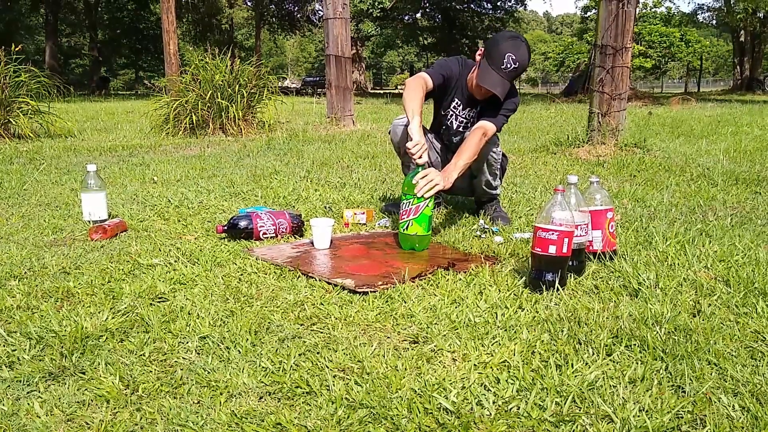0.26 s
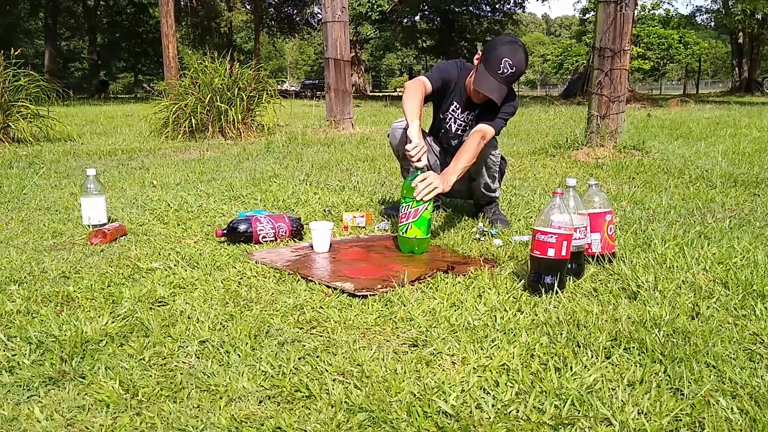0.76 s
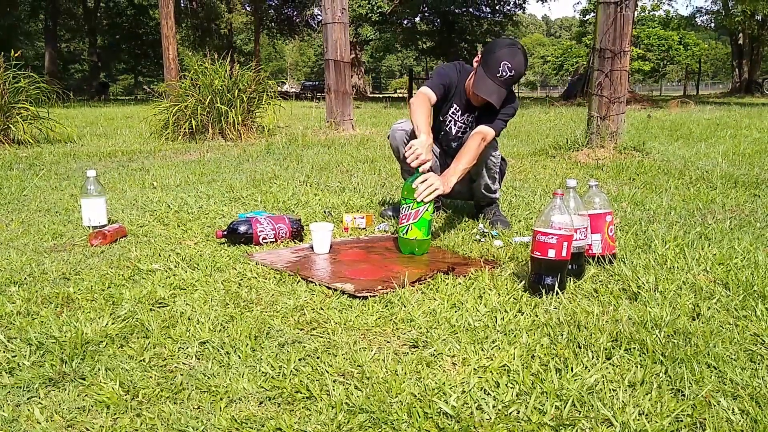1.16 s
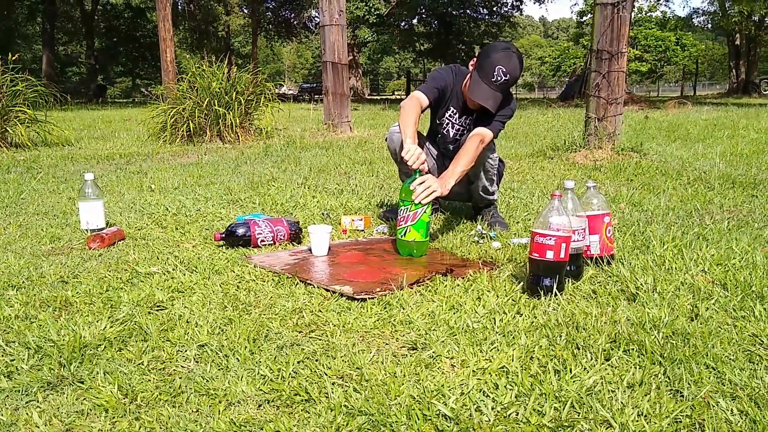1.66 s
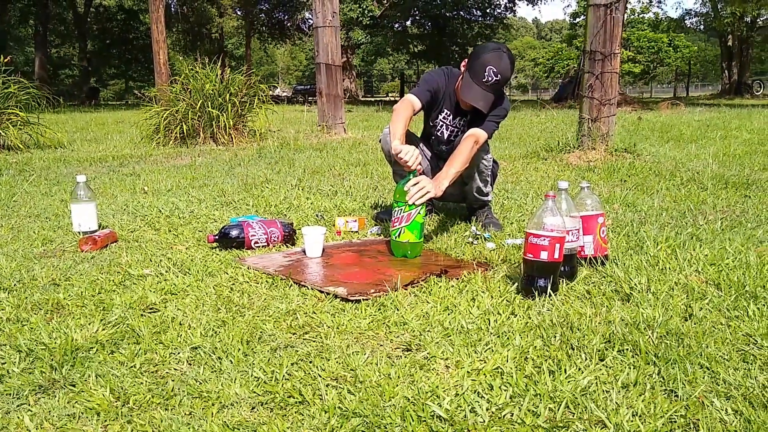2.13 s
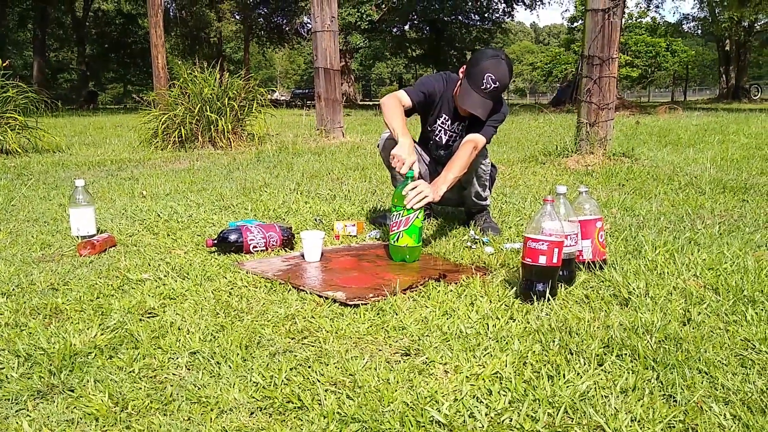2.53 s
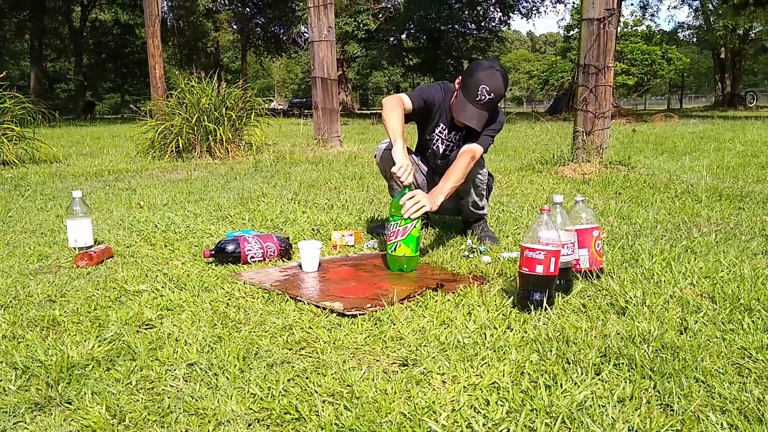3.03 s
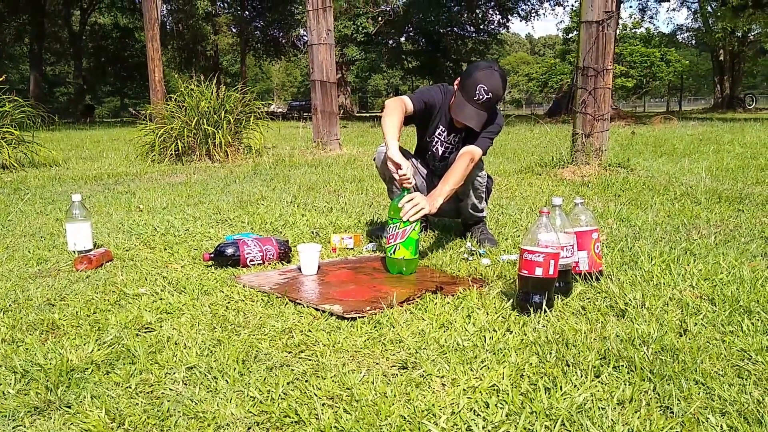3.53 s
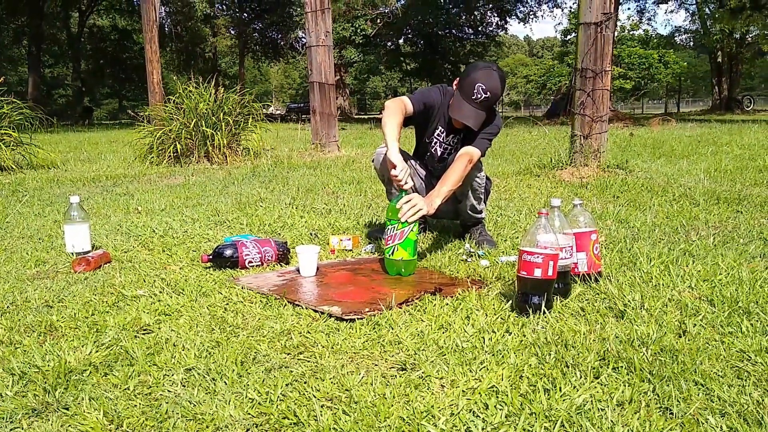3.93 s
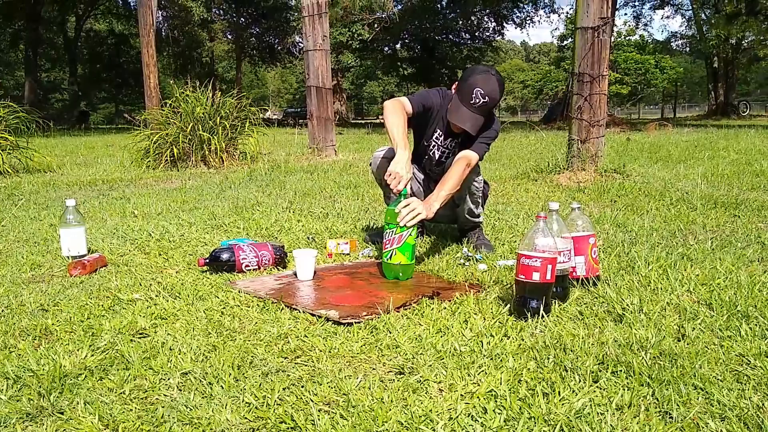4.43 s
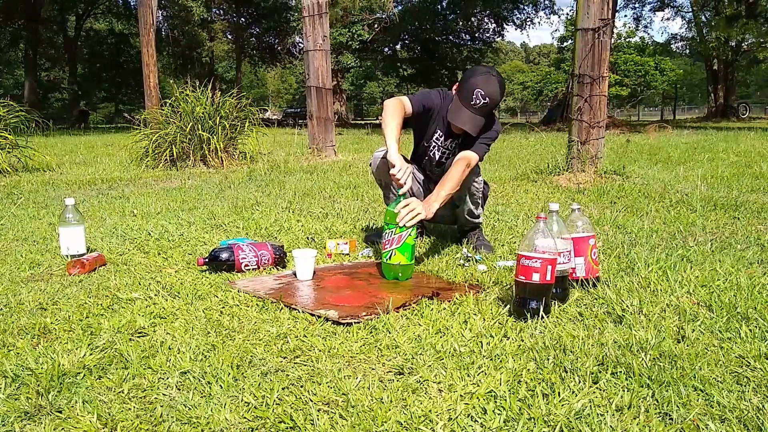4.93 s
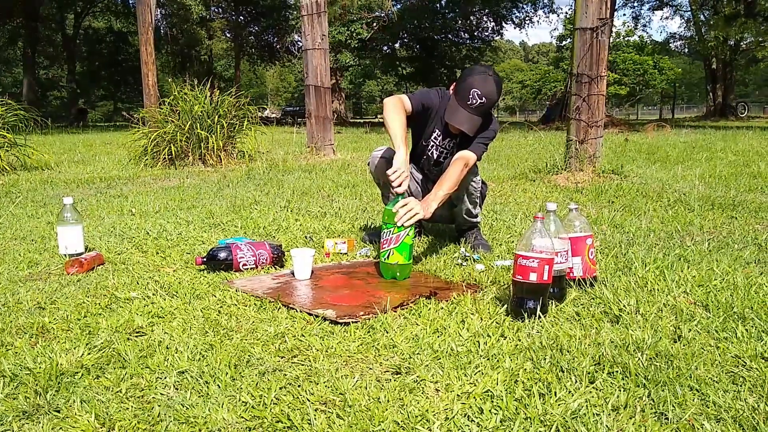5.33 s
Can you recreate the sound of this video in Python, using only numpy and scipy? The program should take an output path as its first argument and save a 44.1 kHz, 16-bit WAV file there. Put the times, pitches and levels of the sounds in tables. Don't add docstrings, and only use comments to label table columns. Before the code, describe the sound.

Bright pressurised hiss leaks from a bottle cap in uneven spurts, widens and cuts off; a shorter, stronger spurt follows with a soft low thud. Later come brittle plastic clicks, a loud snap, and a harsh fluttering squeal still sounding at the cut. Wall and trees give short outdoor echoes. Far birds chirp throughout over a steady high insect buzz at left and faint low traffic, heard by a stereo phone some metres away.

```python
import sys
import numpy as np
from scipy import signal
from scipy.fft import rfft, irfft, next_fast_len
from scipy.io import wavfile

SR = 44100
rng = np.random.default_rng(int(sys.argv[2]) if len(sys.argv) > 2 else 0)


def how_loud(loudness_db):
    steps = np.asarray(loudness_db, float) / 20
    return 10 ** steps


def store_wav(level_fs):
    pcm = np.round(np.clip(np.atleast_2d(level_fs), -1, 1) * 32767)
    wavfile.write(sys.argv[1], SR, pcm.T.astype(np.int16))


N = 245824
T = np.arange(N) / SR
PADDED = next_fast_len(N + 4096)
HZ = np.fft.rfftfreq(PADDED, 1 / SR)


def unit(x):
    return x / np.sqrt(np.mean(x ** 2))


def contour(points):
    hz, db = np.transpose(points)
    return how_loud(np.interp(np.log(HZ + 1), np.log(hz), db))


def hump(hz, width):
    return 1 / (1 + (2 * (HZ - hz) / width) ** 2)


def shape(x, gain):
    return irfft(rfft(x, PADDED) * gain, PADDED)[..., :N]


def noise(gain, channels=1):
    return unit(shape(rng.standard_normal((channels, N)), gain))


def walk(rate):
    return noise(hump(0, 2 * rate))[0]


def curve(rows, quiet=-140):
    s, first, *rest = np.transpose(rows)
    return [np.interp(T, s, first, quiet, quiet)] + [np.interp(T, s, column) for column in rest]


def scatter(x, t60, delay, gain):
    t = T[:int(SR * .8)]
    decay = np.exp(-np.log(1000) * t / t60)
    build_up = 1 - np.exp(-t / delay)
    wash = rng.standard_normal((2, len(t))) * decay * build_up
    wash = wash / np.sqrt(np.sum(wash ** 2, axis=1, keepdims=True))
    return signal.fftconvolve(shape(x, gain)[None], wash, axes=1)[:, :N]


# pitch_hz, level_db
RUMBLE_COLOUR = [(20, -21), (30, -15), (40, 8), (50, -7.5), (65, -3.5), (80, 0.5), (100, -7.5), (125, -12),
                 (142, -9), (165, -15.5), (260, -30), (400, -57)]
# start_s (of the peak), level_db
SWELLS = [(.25, -72), (.44, -61), (.82, -70.5), (1.05, -78), (1.349, -79), (1.472, -59), (1.6, -75),
          (1.78, -68), (1.923, -57), (2.391, -60.5), (2.839, -57.5), (2.931, -75), (3.0, -60.5),
          (3.09, -54.5), (3.21, -85), (3.77, -85), (3.972, -72), (4.22, -75), (4.38, -90), (5.11, -66),
          (5.37, -69), (5.5, -73)]
# pitch_hz, level_db
HUM = [(812.9, -103), (866.7, -100), (931.3, -102)]
# pitch_hz, level_db (per Hz)
AIR = [(100, -1.5), (300, -11), (560, -24), (865, -23), (1100, -27.5), (2000, -21), (3700, -25.5),
       (8800, -26), (13000, -38.5), (15000, -34), (16000, -45)]
# start_s (of the peak), pitch_hz, width_hz, level_db
THUMPS = [
    (1.775, 176, 200, -57),
    (1.546, 880, 520, -72.5),
    (1.546, 2010, 930, -66),
    (1.588, 1890, 170, -70),
    (3, 113, 52, -52),
]
RUMBLE_DB, SWELL_RISE_DB_S, SWELL_FALL_DB_S = -73.5, 189, 119.5
AIR_DB, HUM_DRIFT_DB, THUMP_T60_S = -78, 2.5, 0.075


def distance():
    opposite = np.array([[1], [-1]])
    swell = how_loud(RUMBLE_DB)
    for s, db in SWELLS:
        swell = swell + how_loud(db + np.minimum(SWELL_RISE_DB_S * (T - s), SWELL_FALL_DB_S * (s - T)))
    mid, side = noise(contour(RUMBLE_COLOUR), channels=2) * swell
    rumble = mid + how_loud(-12.0) * side * opposite

    air_mid, air_side = noise(contour(AIR) * (HZ > 100), channels=2) * how_loud(AIR_DB)
    air = shape(air_mid, contour([(300, 0.04), (600, 0.0081)]))
    air = air + shape(air_side, contour([(250, -11.5), (600, 2.0)])) * opposite

    hum = sum(how_loud(db + 3 + HUM_DRIFT_DB * walk(0.73)) * np.sin(2 * np.pi * hz * T) for hz, db in HUM)
    thump = sum(noise(hump(hz, width) ** 2)[0] * how_loud(db - 60 * np.abs(T - s) / THUMP_T60_S)
                for s, hz, width, db in THUMPS)
    return rumble + air + hum + thump


# pitch_hz, width_hz, level_db
KATYDID_BANDS = [(10000, 850, -8.5), (10810, 590, 2.5), (12300, 1300, -4.5)]
# start_s, level_db
KATYDID_LEVEL = [(0, -70.5), (2.2, -74.5), (2.9, -75.5), (3.6, -74), (4.2, -75.5), (4.8, -76), (5.575, -72)]
STROKE_HZ, STROKE_DEPTH = 69.7, .33


def katydid():
    stroke_hz = STROKE_HZ + 0.5 * walk(2.9)
    stroke = 1 + STROKE_DEPTH * np.sin(2 * np.pi * np.cumsum(stroke_hz) / SR)
    buzz = noise(sum(how_loud(db) * hump(hz, 1.9 * width) ** 2 for hz, width, db in KATYDID_BANDS), channels=2)
    drift_db = .8 * walk(3)
    return buzz * stroke * how_loud(curve(KATYDID_LEVEL)[0] + drift_db + np.array([[8], [-9]]))


def add_note(out, start, rows, db, pan_db, flicker):
    s, hz, shape_db = np.transpose(rows)
    t = T[:int(s[-1] * SR)]
    skip = rng.integers(N // 2)
    tone = np.sin(2 * np.pi * np.cumsum(np.interp(t, s, hz)) / SR)
    tone = tone * how_loud(np.interp(t, s, shape_db) + db + 2.5) * flicker[skip:skip + len(t)]
    first = int(start * SR)
    out[:, first:first + len(t)] += tone * how_loud(np.array([[.5 * pan_db], [-.5 * pan_db], [0]]))


# start_s, length_s, pitch_hz (middle), level_db
RISING_RIGHT = [(0, 0.067, 2242, -75), (0.025, 0.12, 3080, -73), (0.075, 0.3, 4550, -74.5),
                (0.16, 0.17, 3610, -71), (0.24, 0.095, 2050, -78), (0.419, 0.23, 3170, -73.5),
                (1.753, 0.11, 5760, -59.5), (0.95, 0.12, 4820, -76), (0.996, 0.12, 2980, -79),
                (3.364, 0.2, 4630, -78), (3.398, 0.066, 4080, -78.5), (3.4, 0.11, 3220, -79.5),
                (3.466, 0.13, 3720, -78), (3.572, 0.19, 5100, -84.5), (4.44, 0.29, 3353, -81.5)]
RISING_AHEAD = [(.12, 0.19, 5070, -79), (0.17, 0.18, 2845, -75), (0.169, 0.16, 3236, -74.5),
                (.5, 0.15, 2800, -73.5), (0.551, 0.097, 3755, -73.5), (1.615, 0.073, 3880, -76.5),
                (1.885, 0.096, 5940, -61), (2.01, 0.13, 6010, -81), (1.945, 0.037, 5500, -73),
                (2.2, .13, 2336, -83.5), (2.302, 0.099, 2810, -82), (2.538, 0.12, 2647, -76.5),
                (2.768, 0.14, 3412, -83), (3.297, 0.34, 2745, -78.5), (3.467, .27, 6033, -76)]
FALLING = [(.2, 0.22, 5220, -79), (.55, 0.1, 5130, -77.5), (0.619, 0.077, 4264, -71),
           (1.712, 0.036, 5520, -53.5), (1.9, 0.088, 6160, -62), (2.52, 0.017, 3420, -87),
           (2.798, 0.12, 2640, -72), (3.47, 0.031, 3470, -81), (3.531, 0.045, 924, -82.5),
           (3.749, 0.12, 2748, -79.5), (5.085, 0.065, 3650, -87)]
LOW_LEFT = [(0.449, 0.25, 1832, -76.5), (.9, 0.07, 1754, -86.5), (1.251, 0.11, 1835, -83.5),
            (1.685, 0.045, 1434, -82.5), (3.4, 0.064, 1370, -82.5), (3.45, 0.14, 1864, -81),
            (4.619, 0.022, 1700, -87), (4.79, 0.091, 1753, -87.5), (4.998, 0.069, 1844, -82),
            (5.461, .11, 374, -86), (5.375, 0.137, 945, -84), (5.38, 0.08, 1837, -75.5)]
STEEP_RIGHT = [(.42, .2, 4104, -67)]
# glide_hz_per_s, pan_db (left minus right)
FAR_BIRDS = [
    (853, -37),
    (746, -15.5),
    (-900, -23),
    (319, 28.5),
    (1698, -28),
]
STRAND_RATIO, STRAND_DB = 1.045, -15


def far_whistles(song, flicker):
    tables = (RISING_RIGHT, RISING_AHEAD, FALLING, LOW_LEFT, STEEP_RIGHT)
    for notes, (glide, pan_db) in zip(tables, FAR_BIRDS):
        for s, length, hz, db in notes:
            db = db - .5 * abs(pan_db)
            rows = [(share * length, hz + glide * length * (share - .5), edge_db)
                    for share, edge_db in ((0, -4), (.2, 0.5), (.75, 2.5), (1, -11.5))]
            strand = [(when, STRAND_RATIO * pitch, edge_db) for when, pitch, edge_db in rows]
            add_note(song, s, rows, db + 7.5, pan_db, flicker)
            add_note(song, s, strand, db + STRAND_DB, pan_db, flicker)


# start_s, level_db
CHIP_AT = [(0.284, -70), (0.483, -61), (0.518, -64), (0.704, -61), (0.741, -71), (1.429, -65.5),
           (1.638, -59.5), (1.673, -63), (1.846, -59.5), (1.884, -76)]
# start_s, length_s, level_db
SWEEP_AT = [(0.335, 0.078, -68), (0.57, 0.045, -61), (0.786, 0.063, -67.5), (1.495, 0.07, -65),
            (1.72, 0.0456, -64.5), (1.944, 0.033, -63.5)]
# start_s, pitch_hz, level_db
RISE_FALL = [(0, 2067, -12), (.012, 2006, 0), (.04, 2050, 0), (.058, 2254, 6), (.068, 2360, 1.5),
             (.078, 1800, 1.5), (.09, 1770, -38)]
# start_s, level_db
RISE_FALL_AT = [(2.374, -76), (2.621, -75), (2.867, -73.5), (3.312, -72), (3.569, -73), (3.824, -73.5)]
# start_s, pitch_hz, level_db
SLUR = [(0, 2850, -18), (.006, 2640, -1), (.012, 2267, 2), (.022, 2036, -7.5), (.034, 1998, -15),
        (.042, 2500, -8.5), (.054, 2200, -3.5), (.075, 2126, -24)]
# start_s, level_db
SLUR_AT = [(4.335, -68), (4.531, -70.5), (4.729, -70), (4.932, -71.5), (5.152, -73), (5.362, -65)]
# start_s, length_s, level_db
BURR_AT = [(4.512, 0.11, -74.5), (4.712, 0.096, -72), (4.903, .12, -77), (5.139, 0.12, -77.5)]
CHIP_S, CHIP_FROM_HZ, CHIP_TO_HZ = .018, 2590, 2454
SWEEP_FROM_HZ, SWEEP_TO_HZ = 2120, 2800
BURR_HZ, BURR_FALL_HZ, BURR_WAVER = 2880, 109, 0.016
BIRD_T60_S, BIRD_WET_DB, BIRD_PAN_DB = 0.35, 4, -19


def birds():
    song = np.zeros((3, N))
    far, near = .75 + .65 * walk(60), .95 + .3 * walk(90)
    far_whistles(song, far)

    wren = [(s, CHIP_S, CHIP_FROM_HZ, CHIP_TO_HZ, db) for s, db in CHIP_AT]
    wren += [(s, length, SWEEP_FROM_HZ, SWEEP_TO_HZ, db) for s, length, db in SWEEP_AT]
    for s, length, from_hz, to_hz, db in wren:
        rows = [(share * length, from_hz + share * (to_hz - from_hz), edge_db)
                for share, edge_db in ((0, -8.5), (.34, -6), (.75, -1), (1, -14.5))]
        add_note(song, s, rows, db, BIRD_PAN_DB, near)

    for phrase, times in ((RISE_FALL, RISE_FALL_AT), (SLUR, SLUR_AT)):
        for s, db in times:
            add_note(song, s, phrase, db, BIRD_PAN_DB, near)

    waver = 1 + BURR_WAVER * walk(70)
    for s, length, db in BURR_AT:
        steps = np.arange(0, length, .002)
        pitch = (BURR_HZ - BURR_FALL_HZ * steps / length) * waver[((s + steps) * SR).astype(int)]
        edge_db = np.interp(steps / length, [0, .15, 1], [-8, 0, -9])
        add_note(song, s, np.transpose([steps, pitch, edge_db]), db, BIRD_PAN_DB, far)

    wash = scatter(song[2], BIRD_T60_S, .012, 1)
    return song[:2] + how_loud(BIRD_WET_DB + np.array([[-3], [3]])) * wash


# start_s, level_db
LEAK = [
    [(0.0, -52.5, 0.1), (0.05, -56.5, 0.04), (0.17, -50, 0.2), (0.41, -53.5, 0.06), (0.61, -54, 0),
     (0.73, -57.5, 0), (1.0, -58, 0.22), (1.22, -59, 0.28), (1.44, -59, 0.13)],
    [(1.44, -58, 0.1), (1.51, -52.5, 0.43), (1.64, -50.5, 0.49), (1.7, -50.5, 0.5), (1.72, -49.5, 0.62),
     (1.85, -47, 1), (2.0, -71, 1), (2.08, -100, 0.8)],
    [(2.95, -93, 0.7), (2.957, -60.5, 0.7), (2.99, -50, 0.69), (3.028, -42.5, 0.8), (3.16, -37, 0.75),
     (3.188, -40.5, 0.9), (3.214, -57.5, 0.8), (3.3, -93, 1)],
]
# pitch_hz, level_db
JET = [(1100, -38), (2200, -28), (6000, -29), (7300, -13), (8500, -0.5), (10500, 8), (12300, 9.5),
       (13500, 8.5), (15500, 10), (15700, -56)]
# pitch_hz, level_db
RUSH = [(600, -21.5), (2300, -25.5), (3300, -16), (3650, 2), (5200, 3.5), (6200, 0), (8200, 11),
        (9500, -2.5), (15000, -68)]
# start_s, level_db
GRIP = [(0, 1), (.15, 8), (.62, 8), (.76, 0), (1.42, -39), (1.52, 3), (2, 12), (3.0, 10), (3.3, 9)]
CAVITY, NECK, ROAR, THROAT = (6755, 980), (4570, 500), (2900, 1060), (4270, 2300)  # (Hz, width Hz)
ROAR_FROM_DB, ROAR_GROWTH, ROAR_DB, ROAR_LAG_S = -36, 2.5, -12, .035
CAVITY_SHUT_DB, CAVITY_OPEN_DB = -11, -18.5
NECK_BEST_GAP, NECK_DB, NECK_FALL_DB = 0.66, -11.5, 44.5
NECK_CHOKE, NECK_CHOKES_DB = 0.7, -43
RUSH_SHUT_DB, RUSH_OPEN_DB = -27.5, -6.5
RUSH_FROM_GAP, RUSH_FULL_GAP = 0.59, 0.775
PORT_LIKENESS = .68


def port_noise(gain):
    common, own = noise(gain, channels=2) * how_loud(0.48 * walk(27) + 0.51 * walk(280))
    return np.array([common, PORT_LIKENESS * common + np.sqrt(1 - PORT_LIKENESS ** 2) * own])


def leak():
    jet = port_noise(contour(JET))
    roar = port_noise(hump(*ROAR) ** 2)
    cavity = port_noise(hump(*CAVITY) ** 2 * contour([(5900, -8.5), (6350, 11.5)]))
    neck = port_noise(hump(*NECK) ** 2)
    rush = port_noise(contour(RUSH))
    throat = port_noise(hump(*THROAT) ** 2)

    last_twist = T > LEAK[2][0][0]
    early, late = curve([*LEAK[0], *LEAK[1]]), curve(LEAK[2])
    jet_db, gap = np.where(last_twist, late, early)
    lagged_db = np.roll(jet_db, int(ROAR_LAG_S * SR))

    roar_db = ROAR_DB + ROAR_GROWTH * np.minimum(lagged_db - ROAR_FROM_DB, 0)
    cavity_db = CAVITY_SHUT_DB + (CAVITY_OPEN_DB - CAVITY_SHUT_DB) * gap + 2.3 * walk(7.5)
    neck_db = NECK_DB - NECK_FALL_DB * np.abs(gap - NECK_BEST_GAP) + 2 * walk(13)
    neck_db = neck_db - NECK_CHOKE * np.maximum(jet_db - NECK_CHOKES_DB, 0)
    rush_db = np.interp(gap, [RUSH_FROM_GAP, RUSH_FULL_GAP], [RUSH_SHUT_DB, RUSH_OPEN_DB])
    throat_db = ROAR_DB + ROAR_GROWTH * (jet_db - ROAR_FROM_DB) + 1.7 * walk(30)

    grip = how_loud(curve(GRIP, quiet=0)[0]) - 1
    screened = shape(jet[1], hump(8600, 3500) ** 2) * grip
    jet = jet + np.array([[0], [1]]) * screened
    gas = jet + how_loud(roar_db) * roar + how_loud(cavity_db) * cavity + how_loud(neck_db) * neck
    gas = gas + how_loud(rush_db) * rush + how_loud(throat_db) * throat
    gas = gas * how_loud(jet_db + 1.96)
    return gas - shape(gas * last_twist, .85 * hump(13850, 300))


# start_s, level_db (peak), body_db, treble_db, pan_db (left minus right)
CRACKS = [(4.2277, -72.5, -7, 37.5, 16), (4.258, -24, -9.5, -2, -1.5), (4.3012, -49, -20, -14, -16),
          (4.314, -52.5, -25, 18.5, -8), (4.368, -27.5, -14, 0, -19), (4.408, -33.5, -50, -7, -4),
          (5.032, -54.5, -32, 5, 2), (5.244, -61, -23, -56, -19), (5.3, -53, -37, 6, -24),
          (5.3092, -39, -2, 8, -18), (5.311, -16.5, -13.5, -9, -1), (5.433, -33, -42, -6, 1)]
# pitch_hz, width_hz, level_db
CAP_MODES = [
    [(4150, 800, 1.5), (5100, 1700, 2.6), (5950, 3500, 6.9), (7500, 1800, 2.2)],
    [(1340, 120, -26.5), (1800, 91, 9), (2370, 720, 10)],
    [(8970, 1100, -5.5), (10720, 1430, 0.5), (13000, 1100, -0.5), (14930, 2330, -2.5)],
]
# start_s, pitch_hz,
# width_hz, level_db
TAB_NOTES = [(4.2585, 1220, 360, -45), (4.258, 1860, 400, -37.5), (4.2583, 3100, 820, -37.5),
             (5.033, 12300, 1300, -40.5), (5.033, 6780, 700, -50), (5.032, 5300, 510, -57.5),
             (5.033, 4550, 340, -59.5), (4.396, 5000, 1800, -44), (5.244, 6600, 580, -48.5),
             (5.244, 5260, 370, -59), (5.3, 5800, 700, -49), (5.31, 1373, 201, -51.5),
             (5.31, 2320, 400, -47), (5.353, 4100, 1500, -48), (5.433, 2340, 300, -46.5),
             (5.432, 2800, 450, -40.5), (5.432, 6750, 1100, -33.5)]
CAP_FROM_HZ, TABS_PAN_DB, TABS_FADE_S = 3240, 0.5, 0.0052


def ring_twice(x, hz, width):
    b, a = signal.iirpeak(hz, hz / (1.55 * width), SR)
    return signal.lfilter(b, a, signal.lfilter(b, a, x))


def cracks():
    out, t = np.zeros((2, N)), T[:900]
    after = t - .001
    snap = np.exp(-np.abs(after) / .00012)
    tear = 0.19 * np.exp(np.minimum(after / 0.0003, -after / 0.0025))
    small = signal.butter(4, CAP_FROM_HZ, "high", fs=SR, output="sos")

    cap, shoulder, tabs = CAP_MODES
    events = []
    for s, db, body_db, treble_db, pan_db in CRACKS:
        events.append((s, pan_db, (cap, db), (shoulder, db + body_db - 6.5), (tabs, db + treble_db + 2.5)))
    for s, hz, width, db in TAB_NOTES:
        events.append((s, -4, ([], 0), ([(hz, width, 0)], db)))

    for s, pan_db, *parts in events:
        push = np.sign(rng.standard_normal(len(t))) * snap + rng.standard_normal(len(t)) * tear
        thin = signal.sosfilt(small, push)
        forces = (thin, push, thin * np.exp(-t / TABS_FADE_S))
        first = int(s * SR)
        for (modes, gain_db), force, turn_db in zip(parts, forces, (0, 0, TABS_PAN_DB)):
            if len(modes) == 0:
                continue
            ring = sum(how_loud(mode_db) * ring_twice(force, hz, width) for hz, width, mode_db in modes)
            side = how_loud(np.array([[.5], [-.5]]) * (np.clip(pan_db + 5.0, -8, 8) + turn_db))
            out[:, first:first + len(t)] += side * how_loud(gain_db - 1.5) * ring / np.abs(ring).max()
    return signal.sosfilt(signal.butter(8, 960, "high", fs=SR, output="sos"), out)


# start_s, pitch_hz (flutter), level_db
SQUEAL = [(5.442, 998, -59), (5.454, 968, -47), (5.465, 985, -48.5), (5.48, 977, -45), (5.497, 960, -45),
          (5.514, 996, -43.5), (5.531, 1007, -44), (5.547, 999, -43.5), (5.575, 1018, -45)]
# multiple (of the flutter), level_db
SQUEAL_PARTIALS = [(1, -37), (1.9, -30.5), (3.08, -5), (3.86, -6), (4.2, -16), (5, 0.5), (6.1, -2),
                   (6.28, -10), (6.95, -0.5), (8, -8), (9, -4), (10, -7), (11, -30), (12, -5), (13, -13),
                   (14, -18), (15, -25)]
SQUEAL_GAS_DB, SQUEAL_FLICKER_DB = -10, 2.2
SQUEAL_LATE_LOWS_DB = 6
WOBBLE_HZ, WOBBLE_TOP_S, WOBBLE_FROM_S, WOBBLE_DEPTH = 78, 5.542, 5.512, .02


def squeal():
    s, hz, db = np.transpose(SQUEAL)
    growth = np.clip((T - s[0]) / (s[-1] - s[0]), 0, 1)
    waver = (.003 + .007 * growth) * walk(100)
    wobble = np.cos(2 * np.pi * WOBBLE_HZ * (T - WOBBLE_TOP_S))
    waver = waver + WOBBLE_DEPTH * np.clip((T - WOBBLE_FROM_S) * WOBBLE_HZ, 0, 1) * wobble
    phase = 2 * np.pi * np.cumsum(np.interp(T, s, hz) * (1 + waver)) / SR

    puffs = np.zeros(N)
    for k, k_db in SQUEAL_PARTIALS:
        late_db = SQUEAL_LATE_LOWS_DB * (1 - growth) * (k < 3.5)
        flicker_db = SQUEAL_FLICKER_DB * (0.3 + growth) * walk(260)
        puffs += np.cos(k * phase + k * k) * how_loud(k_db - late_db + flicker_db)

    gas_colour = contour(JET) + contour(RUSH) + 0.56 * hump(1840, 500) ** 2
    gas = noise(gas_colour, channels=2) * how_loud(SQUEAL_GAS_DB + 6.4 * growth)
    return (unit(puffs) + gas) * how_loud(np.interp(T, s, db, -140))


# pitch_hz, level_db (left minus right)
PORTS = [(1000, 10), (3100, -4.5), (4100, -20.5), (5200, -20.5), (6900, -17), (7600, -11), (9300, 13.5),
         (10300, 7.5), (12400, 8), (13500, 11), (14500, -2), (15500, 9)]
PORT_LAG_S, PORT_LAG_FROM_HZ = .0002, 3100


def ports(left, right):
    tilt = np.sqrt(contour(PORTS))
    lag = np.exp(-2j * np.pi * np.maximum(HZ - PORT_LAG_FROM_HZ, 0) * PORT_LAG_S)
    return np.array([shape(left, tilt), shape(right, lag / tilt)])


SQUEAL_BEAM = .75
WALL_S, WALL_DB = .028, -3.5
WALL_FACE = 2.5
TREES_T60_S, TREES_DB = 0.28, -11.5


def bottle():
    reed = squeal()
    pair = leak() + reed + cracks()
    mono = (pair - SQUEAL_BEAM * reed).mean(axis=0)

    smear = rng.standard_normal((2, 400)) * np.exp(-np.abs(T[:400] - .003) / .0014)
    smear[:, int(.003 * SR)] = WALL_FACE
    smear = smear / np.sqrt(np.sum(smear[0] ** 2))
    wall_colour = [(1500, -13), (3200, -4), (4500, 0.0), (6000, -1.5), (7000, -9.5), (15000, -10.5)]
    late = np.pad(shape(mono, contour(wall_colour)), (int((WALL_S - .003) * SR), 0))
    wall = signal.fftconvolve(late[None], smear, axes=1)[:, :N]
    wall = wall * how_loud(WALL_DB + np.array([[-5], [3]]))

    tree_colour = [(1000, -3), (3000, 8.0), (5000, 2.5), (7500, 4.5), (9500, 4), (15000, -3.0)]
    trees = scatter(mono, TREES_T60_S, 0.026, contour(tree_colour))
    return ports(*pair) + wall + how_loud(TREES_DB) * trees


def scene():
    return distance() + katydid() + birds() + bottle()


def roll_off(x):
    return signal.sosfilt(signal.butter(12, 16670, fs=SR, output="sos"), x)


TOP_HZ, TOP_DB = 15650, -15


def record(dry):
    mix = shape(dry, np.where(HZ < TOP_HZ, 1, how_loud(TOP_DB)))
    return roll_off(mix)


dry = scene()
out = record(dry)
store_wav(out)
```